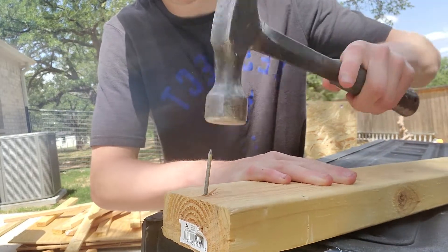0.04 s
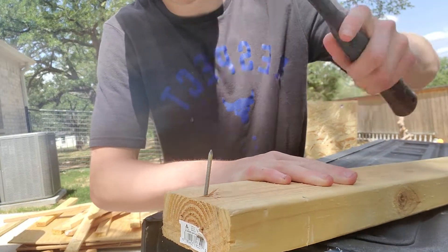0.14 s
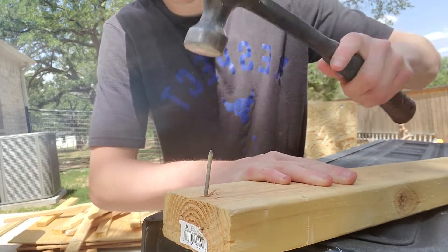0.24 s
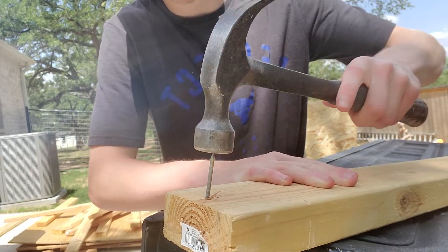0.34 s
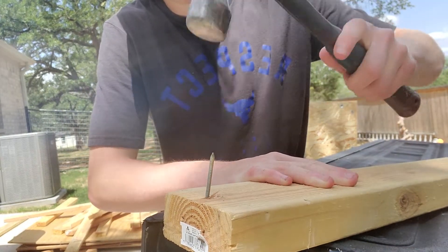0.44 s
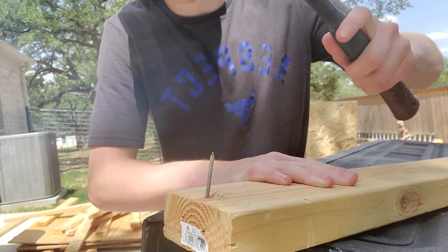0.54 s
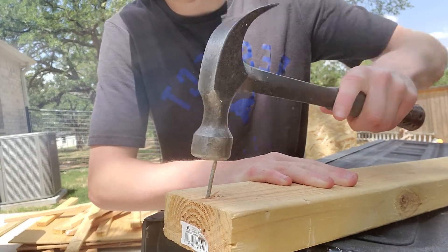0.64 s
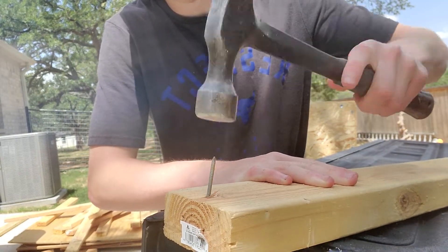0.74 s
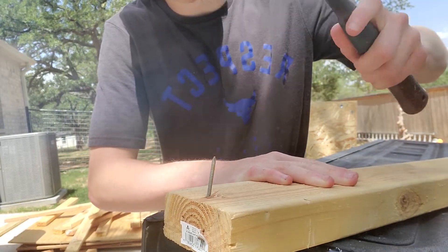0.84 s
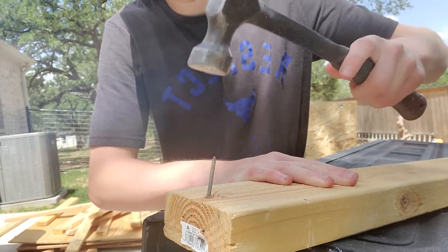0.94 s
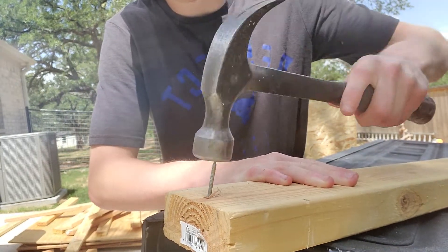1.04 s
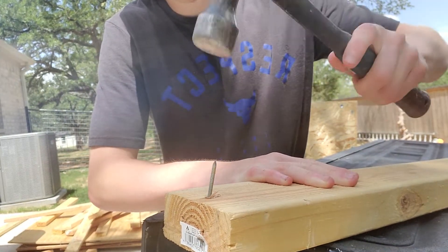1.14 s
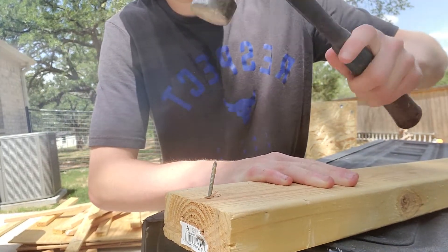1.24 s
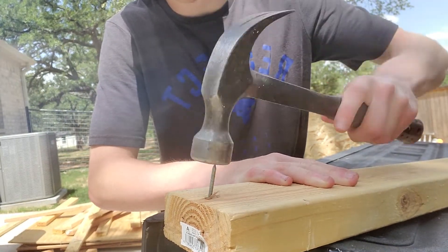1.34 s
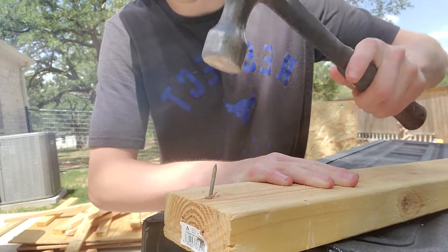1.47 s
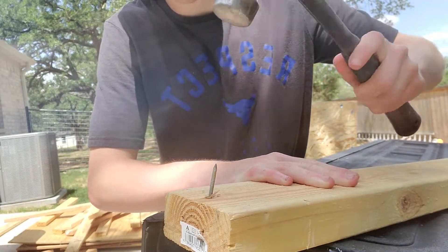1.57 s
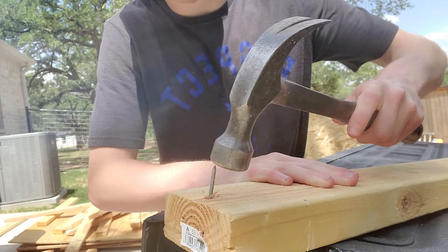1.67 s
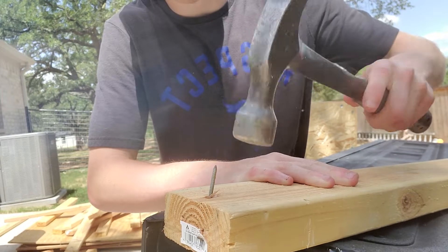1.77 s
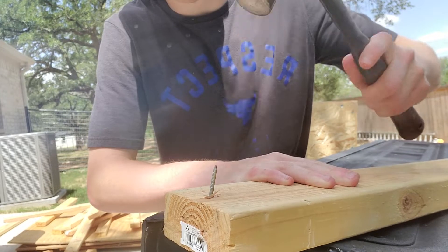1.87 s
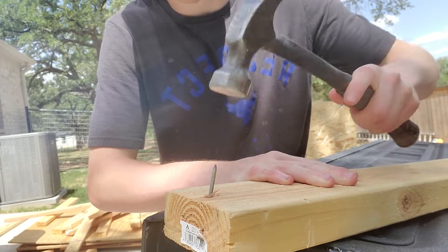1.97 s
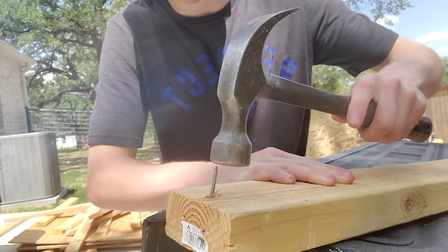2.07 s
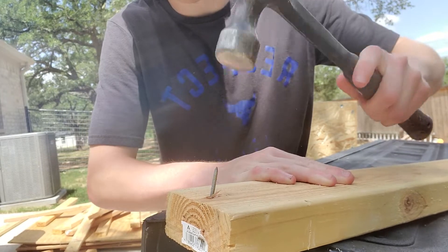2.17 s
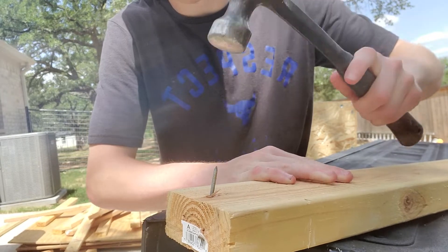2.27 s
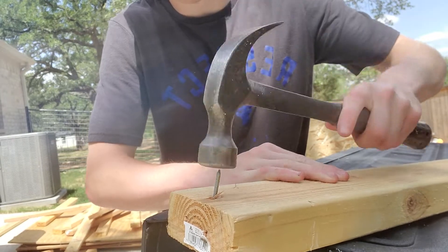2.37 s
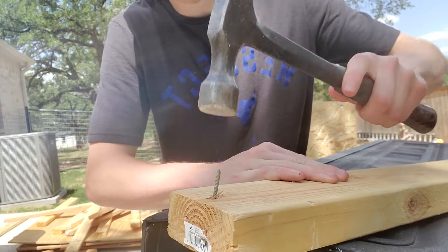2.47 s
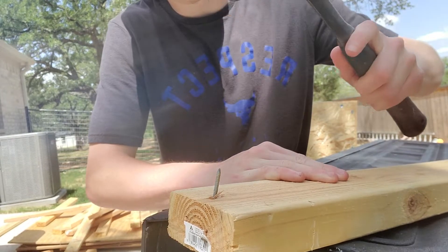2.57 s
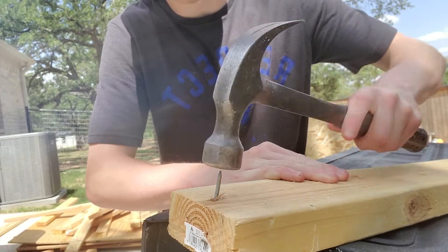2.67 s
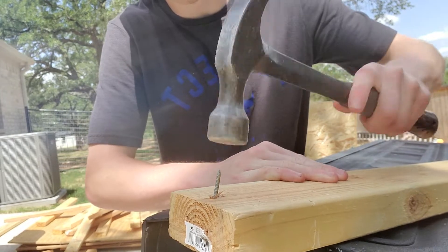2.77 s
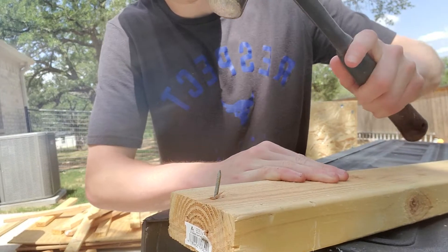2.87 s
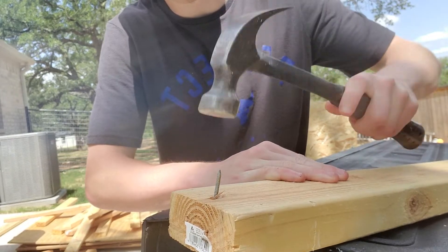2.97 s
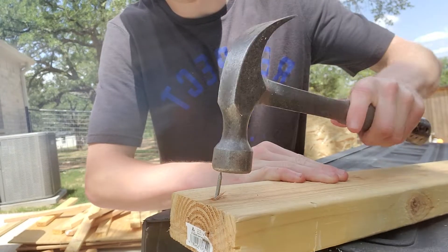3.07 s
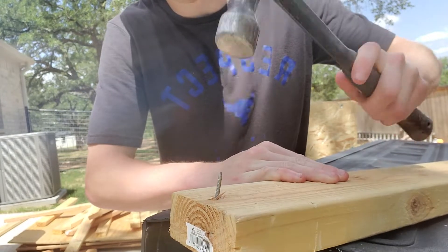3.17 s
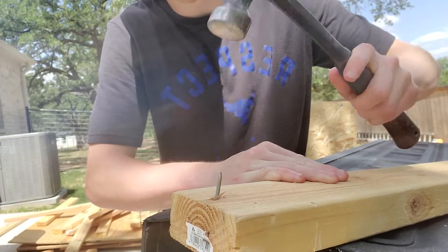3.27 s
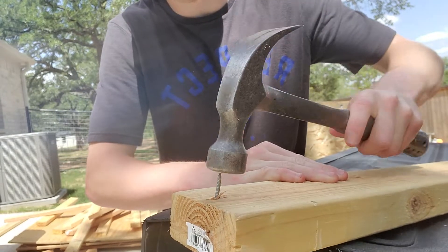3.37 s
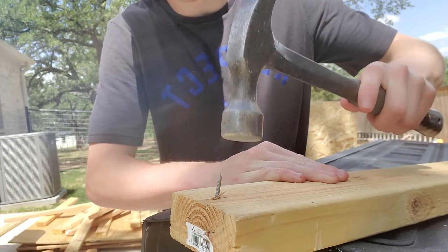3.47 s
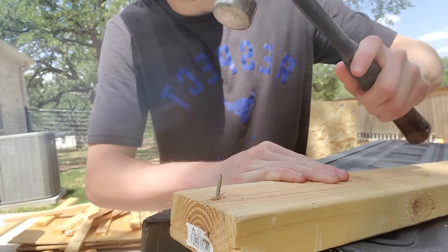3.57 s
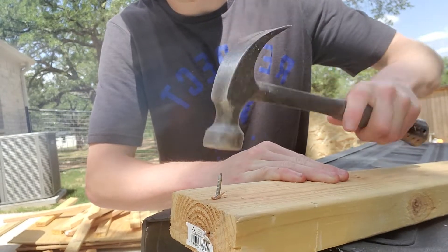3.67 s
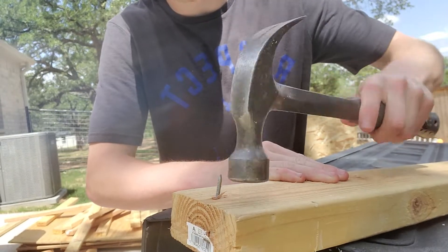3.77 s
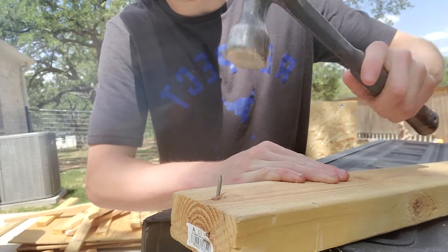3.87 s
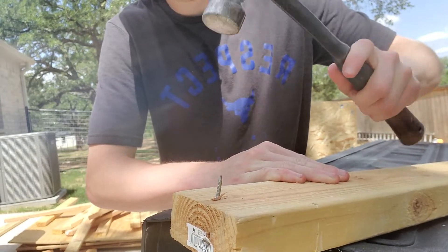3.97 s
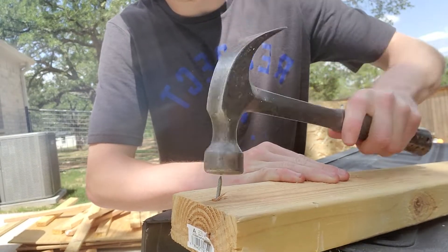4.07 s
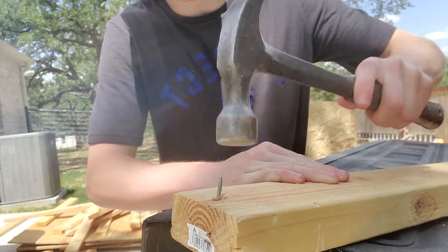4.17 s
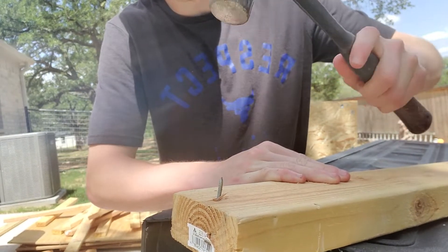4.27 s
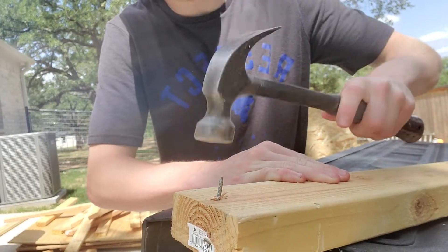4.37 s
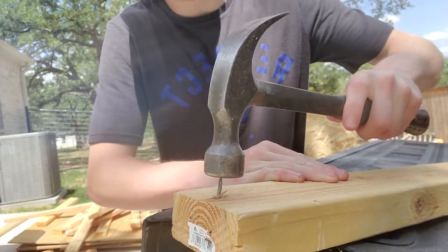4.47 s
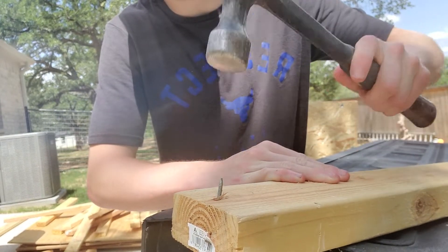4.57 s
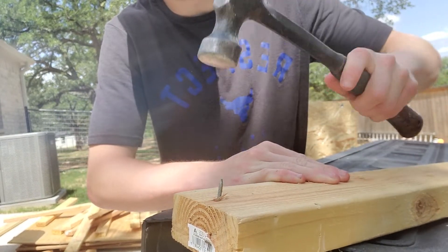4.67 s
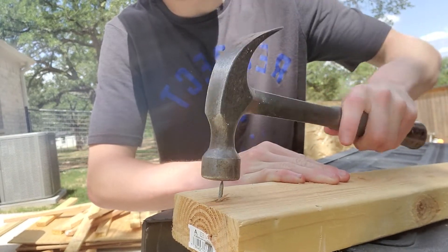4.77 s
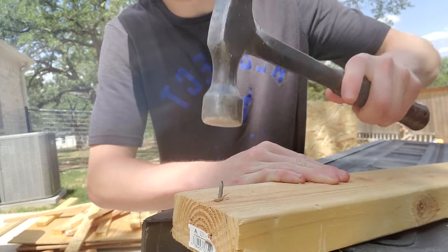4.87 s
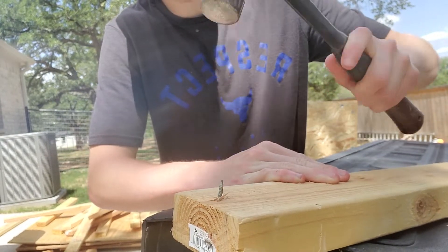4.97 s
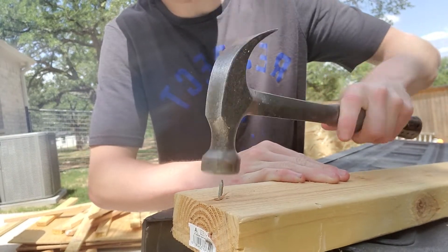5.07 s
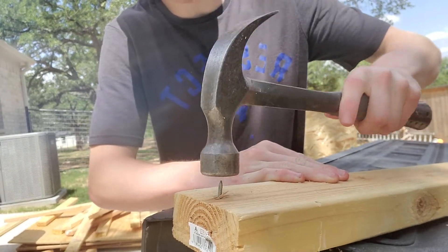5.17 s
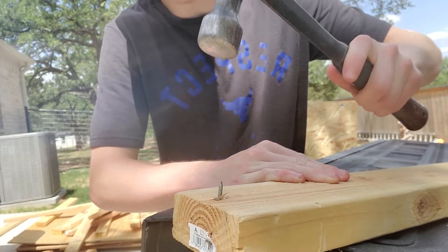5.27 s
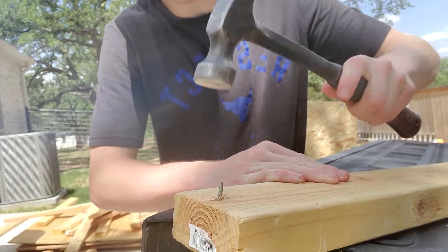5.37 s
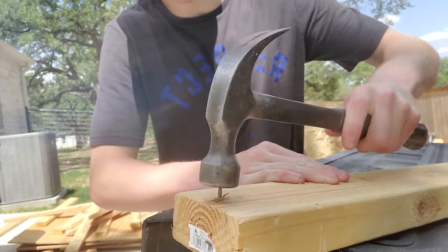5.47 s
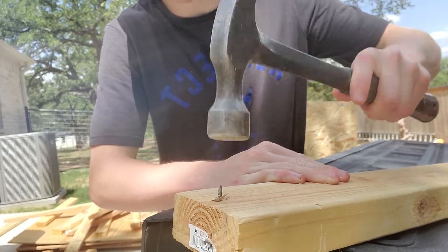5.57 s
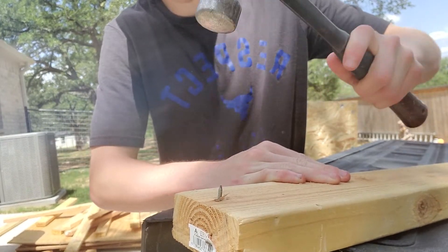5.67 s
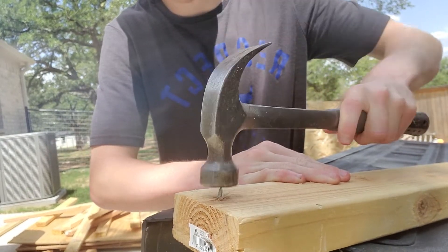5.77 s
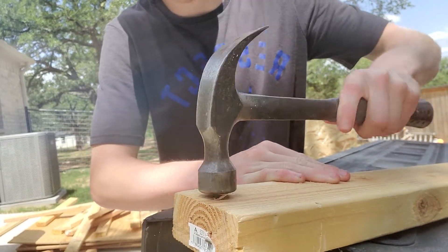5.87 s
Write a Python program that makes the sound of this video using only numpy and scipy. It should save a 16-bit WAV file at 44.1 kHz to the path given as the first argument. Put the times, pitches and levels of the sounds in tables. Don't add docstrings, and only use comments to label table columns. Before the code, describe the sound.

A hammer steadily strikes a nail point in a loose wooden board, each blow ticking, knocking and booming through sheet metal outdoors.

```python
import sys
import numpy as np
from scipy import signal
from scipy.fft import rfft, irfft
from scipy.io import wavfile
from scipy.ndimage import uniform_filter1d

SR = 44100
rng = np.random.default_rng(int(sys.argv[2]) if len(sys.argv) > 2 else 0)


def invert_db(level):
    return 10 ** (np.asarray(level, dtype=float) / 20)


def file_out(sig):
    cols = np.atleast_2d(sig).T
    lim = np.clip(cols, -1, 1)
    pcm = np.round(lim * 32767).astype(np.int16)
    wavfile.write(sys.argv[1], SR, pcm)


N = 261513

# start in seconds, steel tick in dB, knock in the wood in dB,
# brightness in dB, push into the bed in dB.
BLOWS = [(0.0114, -14, -10.5, -28.5, -5), (0.352, -10, -11.5, -23, -3.5), (0.6949, -12.5, -12, -14, -12),
         (1.042, -10.5, -19, -15, -11), (1.3757, -10, -18, -17, -7.5), (1.712, -8, -14, -21.5, -6),
         (2.065, -9, -13, -15, -4), (2.397, -11.5, -15, -12, -6), (2.7461, -8, -14, -15, -4.5),
         (3.0825, -9.5, -13, -15, -5.5), (3.423, -8, -15, -17, -3), (3.7662, -7, -15.5, -21.5, -5),
         (4.128, -10, -13, -15, -5.5), (4.4666, -12.5, -18.5, -12.5, -7), (4.807, -9, -18.5, -18, -6),
         (5.153, -8, -17, -19, -6.5), (5.4921, -11, -15, -13, -7), (5.8467, -13, -14, -11, -7.5)]
# pitch in Hz, level in dB, time to fall by 60 dB in seconds.
WOOD = [(430, -8, 0.17), (567, -8, 0.2), (686, -9.5, 0.28), (813.5, -8, 0.23), (1277, 5, 0.027),
        (1399, -8.5, 0.17), (1518, -14.5, 0.19), (1770, -14.5, 0.22), (1990, -9, 0.091), (2220, 2, 0.069),
        (2730, -19, 0.42), (2820, -24.5, 0.08), (3250, -29.5, 0.28), (4000, -21.5, 0.069)]
LOW_CLACK = [(1137, 0.48, 0.09), (1173.6, -2, 0.094)]
HIGH_CLACK = [(1604, -15, 0.25), (1639, 1, 0.085), (1663.5, 0.5, 0.09), (2130, -16.5, 0.18),
              (3280, -20, 0.13), (4270, -11.5, .1)]
BED = [(102.36, -15, 1), (132.7, -19.5, 1), (162.6, -5, 0.54), (225.9, -4, 0.39), (246.6, -4.5, 0.42),
       (263.4, -13.5, 0.15), (322.8, -10.5, .25), (360.6, -15, 0.55), (386, -10, 0.3), (422, -9.5, .25),
       (449.5, -10, .2), (480.6, -11, 0.14), (531.7, -13, 0.14)]
# frequency in Hz, likeness from 0 to 1.
LIKENESS = [(60, 0.97), (180, 0.95), (350, 0.78), (700, 0.78), (1500, 0.72), (4000, 0.31), (9000, 0.75),
            (15000, 0.75)]


def evened(x):
    return x / np.sqrt(np.mean(x ** 2) + 1e-20)


def wander(count, width):
    return evened(uniform_filter1d(rng.standard_normal(count), width))


def read(points, hz):
    f, value = np.transpose(points)
    return np.interp(np.log(hz + 1), np.log(f + 1), value)


def clicks(s, size):
    place = np.round(np.asarray(s) * SR).astype(int)
    return np.bincount(np.clip(place, 0, N - 1), size, N)


def smooth(x, seconds):
    r = np.exp(-1 / (max(seconds, 1e-5) * SR))
    return signal.lfilter([1 - r], [1, -r], x)


def dying(s, db, t60):
    return signal.lfilter([1], [1, -invert_db(-120 / t60 / SR)], clicks(s, invert_db(2 * db)))


def port_noise():
    a, b = rfft(rng.standard_normal((2, N)))
    same = np.clip(read(LIKENESS, np.fft.rfftfreq(N, 1 / SR)), 0, 1)
    return np.array([same * a + np.sqrt(1 - same ** 2) * b, a])


def ring(modes, s, db, spread_db, detune, rise_s, scatter=1):
    out = np.zeros((2, N + SR))
    chance = rng.standard_normal((len(s), 4, len(modes)))
    hz, mode_db, t60 = np.transpose(modes)[:, :, None]
    t = np.arange(int(min(t60.max(), .6) * SR)) / SR
    rise = (1 - np.exp(-t / rise_s)) ** 2
    soft_end = np.minimum((t[-1] - t) / 0.0218, 1)
    fade = invert_db(mode_db - 60 * t / t60) * rise * soft_end
    skew = np.arccos(np.clip(read(LIKENESS, hz[:, 0]), 0, 1))
    for at, level_db, (share, pitch, phase, port) in zip(s, db, chance):
        bent_hz = hz * (1 + detune * pitch[:, None])
        turn = np.exp(2j * np.pi * (bent_hz * t + scatter * phase[:, None]))
        weight = invert_db(level_db + spread_db * share) * np.exp(1j * np.outer([1, 0], skew * port))
        start = round(at * SR)
        out[:, start:start + len(t)] += (weight @ (turn * fade)).imag
    return out[:, :N]


def clatter(s, tick_db, knock_db, bright_db, tail_db, slowness):
    # band centre in Hz, crack level in dB, crack fall time (60 dB) in seconds,
    # tail level in dB, tail fall time (60 dB) in seconds, rise time in seconds.
    rattle_bands = [(120, -40.5, .1, -11, .6, 0.05), (305, -7.5, 0.05, -7.5, 0.5, 0.0036),
                    (660, -3.5, 0.038, -7.5, 0.25, 0.0083), (1204, -6.5, 0.023, -18, 0.36, 0.0016),
                    (2315, 1, .03, -12, 0.31, 0.0024), (5070, 3, 0.023, -15, 0.3, .0005),
                    (7105, -14, 0.0089, -37, 0.36, .0004), (7530, -23.5, 0.017, -39.5, 0.22, .0003),
                    (8750, -3.5, .018, -31, 0.33, 0.00022), (13600, -3.5, 0.012, -31, 0.27, 0.00039),
                    (14750, -8.5, 0.02, -27, .27, .0003)]
    noise, hz, out = port_noise(), np.fft.rfftfreq(N, 1 / SR), np.zeros((2, N))
    centres = np.transpose(rattle_bands)[0]
    smoothed = uniform_filter1d(uniform_filter1d(rng.standard_normal(N), 120), 120)
    rattle = invert_db(3.2 * evened(smoothed))
    for k, (centre, crack_db, crack_t60, band_db, tail_t60, rise_s) in enumerate(rattle_bands):
        only_this = np.arange(len(centres)) == k
        band = np.sqrt(read(list(zip(centres, only_this)), hz)) * (hz > centres[0] / 2)
        wood_share = np.clip(np.log2(2600 / centre) / 2, 0, .7)
        db = tick_db + (knock_db - tick_db) * wood_share
        treble_db = bright_db * np.clip(np.log2(centre / 3000) / 1.88, 0, 1)
        crack = dying(s, db + treble_db, crack_t60)
        tail = dying(s, db + 0.5 * treble_db - 5.5, tail_t60)
        power = invert_db(2 * crack_db) * crack + invert_db(2 * (band_db + tail_db)) * tail * rattle
        out += evened(irfft(noise * band, N)) * np.sqrt(smooth(power, slowness * rise_s))
    return out


def yard():
    # frequency in Hz, strength in dB.
    hum_spectrum, hum_db = [(15, -40.5), (25, -30.5), (80, 3), (187, -5.5), (259, -14.5), (568, -26.5),
                            (1600, -34.5), (2460, -35.5), (4990, -43), (6550, -54), (7510, -68.5),
                            (14800, -76), (16500, -85.5)], -34.5
    swell = wander(N, 6000)
    hum = irfft(port_noise() * invert_db(read(hum_spectrum, np.fft.rfftfreq(N, 1 / SR))), N)
    return invert_db(hum_db - 6.5 + 0.59 * swell) * evened(hum)


def blows():
    # pitch in Hz, level in dB, time to fall by 60 dB in seconds.
    steel_modes = [(1470, -4.5, .03), (2181, 4.5, 0.038), (3150, -10, .025), (3400, -11, 0.038),
                   (4150, 3.5, 0.057), (5190, 0.5, 0.037), (5800, -25, .018), (6250, 4, 0.025)]
    head_modes = [(1636, 0, .42), (1662, -5, .3), (2195, -4, .4), (2700, -9, .34), (2740, -11, .3),
                  (3330, -7, .3), (4140, -9, .25)]
    # start in
    # seconds, level in dB, pitch in Hz.
    nail_rings = [(0.0134, -14, 2200), (0.353, -7, 2214), (1.042, 2, 4010), (1.3779, -12.5, 4270),
                  (1.712, -12, 4000), (2.064, -15.5, 5870), (2.397, -24.5, 4150), (3.7667, -16, 5950),
                  (5.155, -11.5, 5530), (5.4926, -21, 6430), (5.8464, -14, 6250)]
    s, tick_db, knock_db, bright_db, _ = np.transpose(BLOWS)
    spread_db = 1.6
    steel = ring(steel_modes, s, tick_db - 3.5 + 0.74 * bright_db, spread_db, detune=0.0046, rise_s=0.000067)
    nail = sum(ring([(hz, 0, .022)], [at], [db], 0, 0, rise_s=.0003) for at, db, hz in nail_rings)
    board = WOOD + LOW_CLACK + HIGH_CLACK
    wood = ring(board, s, knock_db - 5.5, spread_db, detune=0.0066, rise_s=0.00036)
    head = ring(head_modes, s, tick_db - 23 + 0.21 * bright_db, 3.4, detune=0.0026, rise_s=0.0016)
    rattle = clatter(s, tick_db - 7.5, knock_db, bright_db + 4.5, tail_db=2.32, slowness=1)
    return steel + nail + head + wood + rattle


def bed():
    # pitch in Hz, level in dB, time to fall by 60 dB in seconds.
    sway_modes = [(57.46, -5, 0.76), (65.52, -2, 0.75), (74.76, -3, 0.73), (86.8, -7, 0.22)]
    linger_modes = [(183.9, 0, 0.89)]
    late_modes = [(291, 8, .36)]
    s, push_db = np.transpose(BLOWS)[[0, -1]]
    slide_s = 1.9
    thump_hz = 211.75 - 16 * np.clip((s - slide_s) / 0.34, 0, 1)
    thump = sum(ring([(hz, 0, .28), (.9 * hz, -6, .25)], [at], [db], 0, 0, rise_s=.010, scatter=0.1)
                for at, db, hz in zip(s, push_db, thump_hz))
    boom_db = -9.5 + .3 * push_db + 5.5 * np.exp(-s / 0.46)
    boom = ring(BED, s, boom_db - 3.0, 2., detune=0.02106, rise_s=0.0091)
    sway = ring(sway_modes, s, -17.5 - 1.38 * s, 0.99, detune=0.018, rise_s=.025, scatter=0.22)
    linger = ring(linger_modes, s, push_db - 22.5 + 7 * (s > slide_s), 0.31, detune=.01, rise_s=0.081)
    late = ring(late_modes, s, -15 - 0.55 * s, 0, detune=0.0044, rise_s=.06)
    return thump + boom + sway + linger + late


def hops():
    # start in seconds, click in dB, knock in the wood in dB,
    # low clack in dB, high clack in dB.
    slaps = [(0.7244, -18, -26.5, -37, -33), (0.7334, -12.5, -27.5, -24.5, -20.5),
             (2.4294, -11, -14.5, -14.5, -9), (2.4344, -16, -12.5, -24, -37),
             (2.4424, -21, -21.5, -28, -17.5), (2.8034, -28, -20, -23, -27.5), (3.1168, -13, -19, -29, -17),
             (3.1314, -24, -26, -25, -29), (3.463, -17, -13.5, -21.5, -23),
             (3.7984, -24, -12.5, -37.5, -27), (4.1624, -15.5, -18, -11.5, -22.5),
             (4.171, -24, -24, -23, -29.5), (4.4764, -19, -12, -30, -19.5), (4.4937, -5.5, -12.5, -11, -22),
             (4.5034, -17, -38, -22.5, -14), (4.8339, -9, -12, -11, -11), (4.8434, -11, -22, -22.5, -9),
             (5.1624, -16.5, -39, -33.5, -18), (5.1704, -19.5, -40, -24, -32.5),
             (5.1796, -7.5, -15, -13.5, -42), (5.1934, -19.5, -28.5, -20, -17),
             (5.5179, -12, -15, -18.5, -16.5), (5.5304, -14, -30.5, -19, -20.5), (5.8554, -16, -7, -8, -12)]
    # start in seconds, click in dB.
    settling_taps = [(0.0689, -38), (0.405, -32), (1.0744, -44.5), (1.4314, -28), (1.7694, -32),
                     (2.096, -39), (2.1184, -34), (2.4958, -41), (2.8484, -38), (3.1802, -34), (3.824, -29),
                     (3.8677, -39.5), (4.1876, -29), (4.5604, -40.5), (5.2014, -27.5), (5.2564, -47),
                     (5.5384, -18)]
    rebounds = []
    for s, tick_db, knock_db, *_ in BLOWS[1:]:
        if s < 3.6:
            clack_db = knock_db - 20
            rebounds.append((s + .017, tick_db - 19, knock_db - 0.5, clack_db, clack_db))
    taps = [(s, db, db - 1, db - 7, db - 7) for s, db in settling_taps]
    return np.transpose(rebounds + list(slaps) + taps)


def landings():
    s, click_db, knock_db, low_db, high_db = hops()
    bright_db = -27 - 0.52 * click_db
    spread_db = 2.5
    wood = ring(WOOD, s, knock_db - 9.0, spread_db, detune=.006, rise_s=0.000094)
    low_clack = ring(LOW_CLACK, s, low_db, 1, detune=0.0084, rise_s=0.0017)
    high_clack = ring(HIGH_CLACK, s, high_db, 1.0, detune=0.0028, rise_s=0.00055)
    push = ring(BED, s, knock_db - 27, spread_db, detune=0.028, rise_s=0.0025)
    rattle = clatter(s, click_db - 6, knock_db - 3.0, bright_db + 1.5, tail_db=-7.0, slowness=2.6)
    return wood + low_clack + high_clack + push + rattle


def cricket():
    # start in seconds, end in seconds, level in dB.
    phrases = [(0.51, .69, -87), (0.188, 0.283, -92), (.82, 1.03, -77), (1.178, 1.357, -74),
               (1.51, 1.68, -76), (3.613, 3.714, -86), (3.926, 4.092, -85.5), (4.302, 4.421, -85),
               (4.65, 4.74, -84.5), (5.345, 5.46, -83.5), (5.71, 5.83, -83)]
    t = np.arange(N) / SR
    level = sum(invert_db(db) * np.clip(np.minimum(t - start, end - t) / 0.04, 0, 1)
                for start, end, db in phrases)
    waver = 1 + 0.14 * wander(N, 900)
    return 2.7 * level * waver * np.sin(2 * np.pi * 4968 * t)


def bird():
    # start in seconds, end in seconds, first pitch in Hz, last pitch in Hz, level in dB.
    whistles = [
        (0.216, 0.278, 3100, 2950, -58.5),
        (0.619, 0.67, 2900, 3050, -59),
        (2.661, 2.72, 3500, 2900, -61),
        (4.009, 4.05, 3400, 3380, -72),
        (5.394, 5.425, 3660, 3950, -73.5),
        (5.421, 5.479, 3100, 3480, -65),
        (5.448, 5.477, 2750, 3050, -61),
    ]
    out = np.zeros(N)
    for start, end, from_hz, to_hz, db in whistles:
        hz = np.linspace(from_hz, to_hz, round((end - start) * SR))
        flutter = 1 + .9 * wander(4000, 150)[:len(hz)]
        tone = np.sin(2 * np.pi * np.cumsum(hz) / SR)
        out[round(start * SR):][:len(hz)] += invert_db(db - 3) * np.hanning(len(hz)) * flutter * tone
    return out


def stray_tick():
    # start in seconds, level in dB.
    moment = (2.3055, -49)
    # pitch in Hz, level in dB, time to fall by 60 dB in seconds.
    grit_modes = [(5200, -8, .015), (5700, -4, .015), (6400, -4, .015), (11200, -9, .012),
                  (12500, -6, .012), (14900, -6, .012)]
    return ring(grit_modes, moment[:1], moment[1:], 0, 0, rise_s=0.00031)


def at_ports(sound):
    # frequency in Hz, left minus right in dB.
    balance = [(60, -1.5), (110, -2), (200, -2.5), (380, -3), (700, -5), (1290, -2.5), (2380, -4),
               (4400, -5.5), (8120, -15.5), (15000, -19.5)]
    # frequency in Hz, phase in radians that the case adds to the left lag.
    case_turn = [(200, 0.11), (400, 0.66), (750, 0.51), (1200, 0.6), (2500, 0)]
    hz = np.fft.rfftfreq(N + SR, 1 / SR)
    tilt = invert_db(np.outer([.5, -.5], read(balance, hz)))
    left_phase = 2 * np.pi * .00013 * hz + read(case_turn, hz)
    lag = np.exp(-1j * np.outer([1, 0], left_phase))
    return irfft(rfft(sound, N + SR) * tilt * lag, N + SR)[:, :N]


def scene():
    sound = yard() + blows() + bed() + landings() + stray_tick()
    return at_ports(sound) + cricket() + bird()


def low_pass(x):
    return signal.sosfilt(signal.butter(12, 16850, fs=SR, output="sos"), x)


def record(dry):
    limit_db, recovery_db_per_s = -2, 220.
    dry = signal.oaconvolve(dry, signal.firwin(101, 15450, fs=SR)[None], "same")
    peak_db = 20 * np.log10(abs(dry).max(0) + 1e-9)
    fall = np.arange(N) * recovery_db_per_s / SR
    held_peak_db = np.maximum.accumulate(peak_db + fall) - fall
    over_db = np.maximum(held_peak_db - limit_db, 0)
    held = dry / invert_db(.75 * smooth(over_db, .0015))
    return low_pass(np.clip(held, -1, 1))


dry = scene()
out = record(dry)
file_out(out)
```